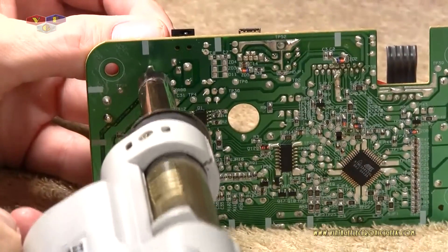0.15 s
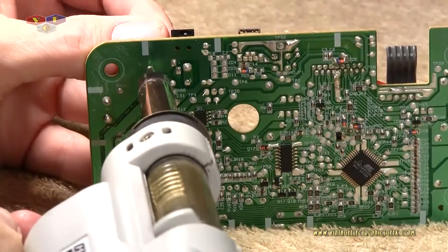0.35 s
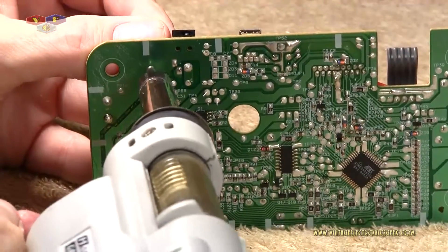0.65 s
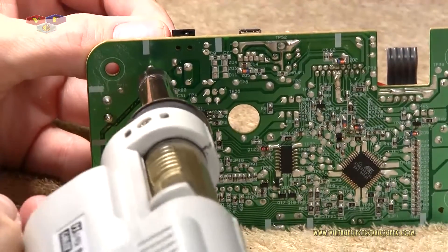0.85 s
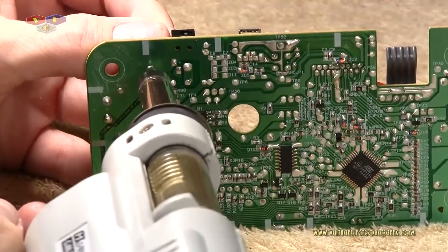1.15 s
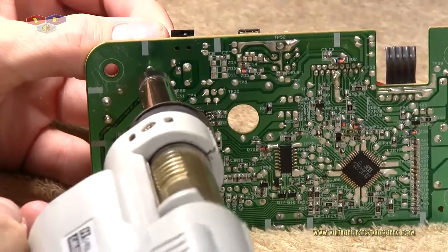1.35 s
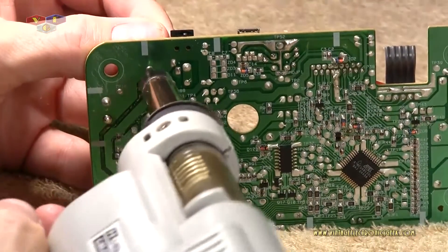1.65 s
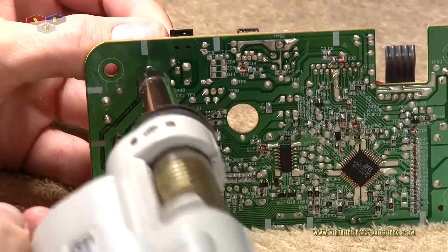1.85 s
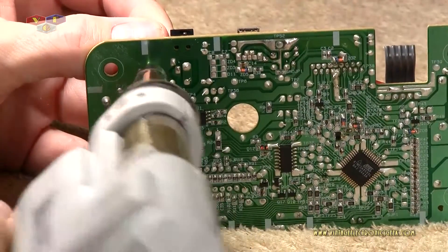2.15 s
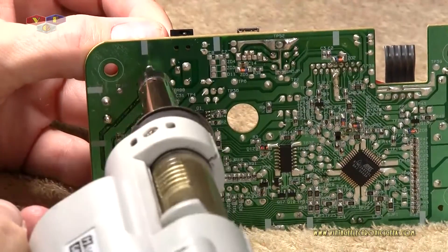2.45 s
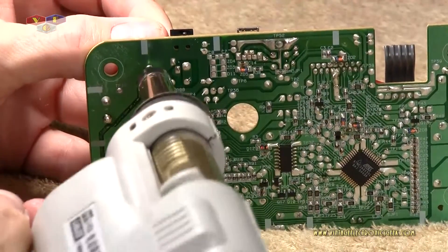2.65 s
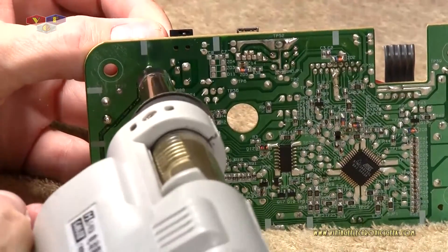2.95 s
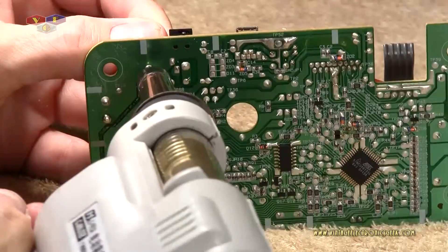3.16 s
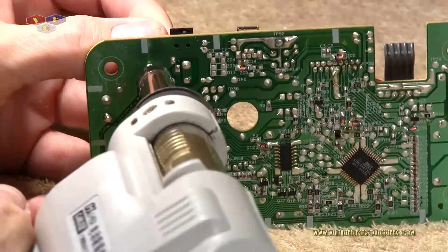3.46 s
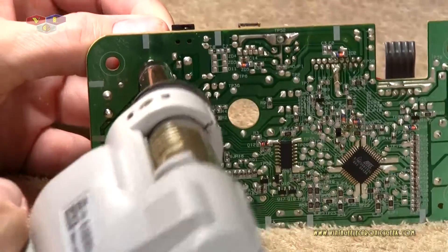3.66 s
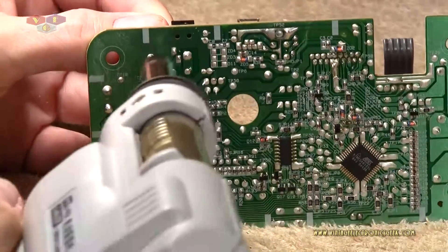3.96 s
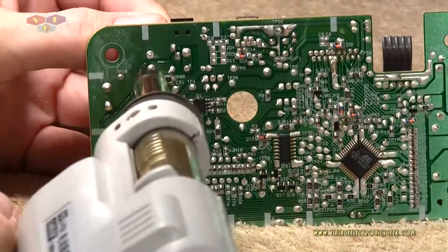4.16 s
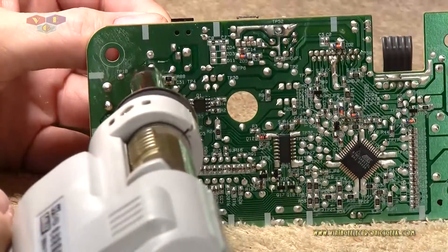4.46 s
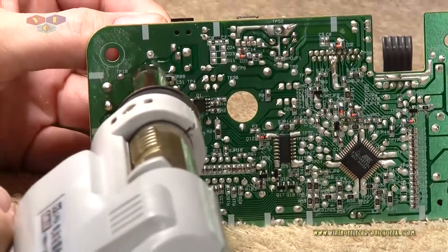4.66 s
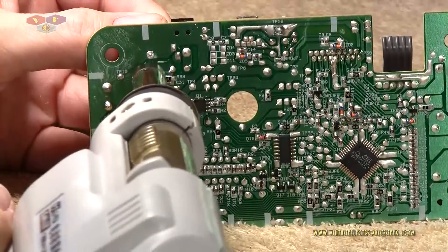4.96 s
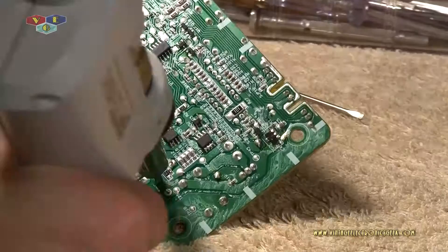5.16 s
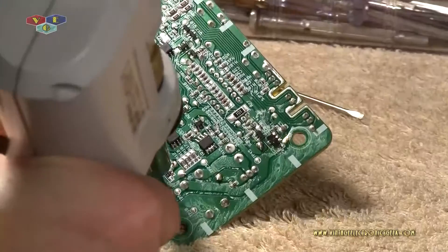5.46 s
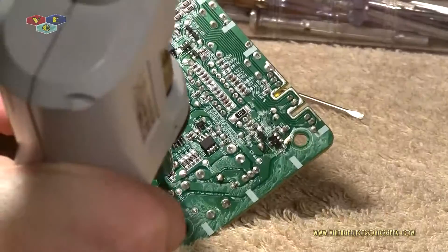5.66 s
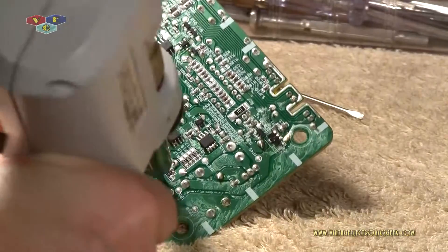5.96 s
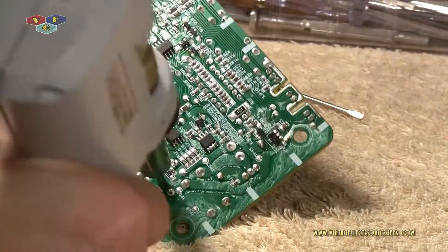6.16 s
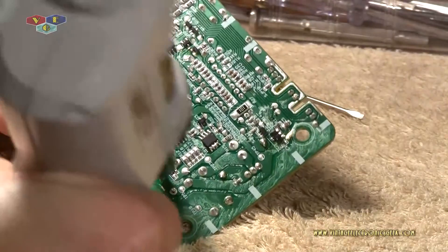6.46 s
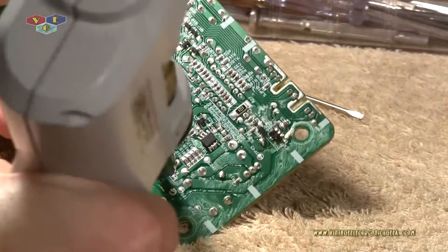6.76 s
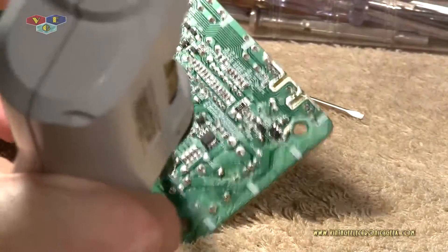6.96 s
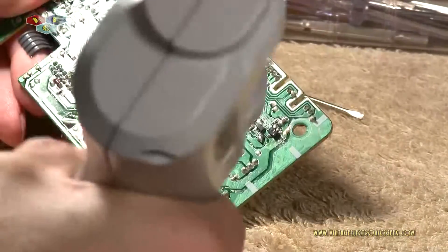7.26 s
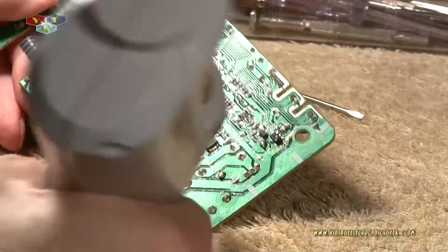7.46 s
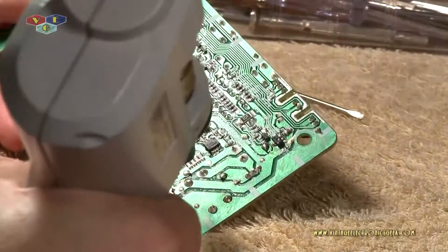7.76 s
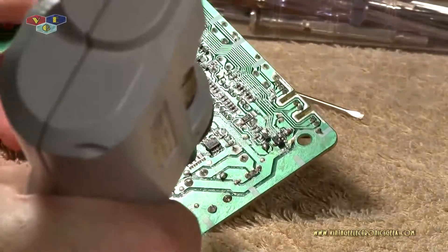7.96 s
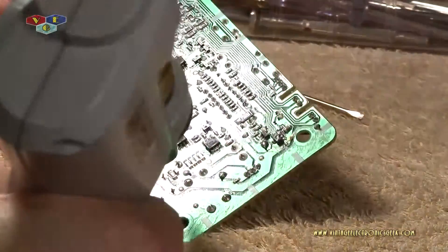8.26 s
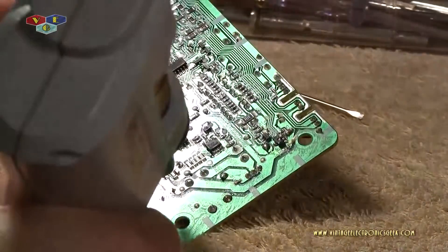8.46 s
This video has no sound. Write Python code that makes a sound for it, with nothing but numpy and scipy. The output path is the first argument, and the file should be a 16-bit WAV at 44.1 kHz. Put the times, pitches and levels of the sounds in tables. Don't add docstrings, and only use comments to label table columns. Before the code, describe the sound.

Close to the microphone, a hand-held desoldering gun clicks and its pump rattles for under half a second, then coasts out in separate knocks. After quiet fan hum and faint taps on a circuit board, a second burst lasts nearly a second, sagging in speed. The third, heard from behind the gun, is longer and steadier, stopping in a few loose knocks. Small, fairly dry room.

```python
import sys
import numpy as np
from scipy import signal
from scipy.io import wavfile
from scipy.ndimage import uniform_filter1d

SR = 44100
rng = np.random.default_rng(int(sys.argv[2]) if len(sys.argv) > 2 else 0)


def to_linear_factor(level_db):
    exponent = np.asarray(level_db, float) / 20
    return 10 ** exponent


def to_wav(sig):
    pcm = np.clip(np.atleast_2d(sig), -1, 1) * 32767
    pcm = np.round(pcm).astype(np.int16)
    wavfile.write(sys.argv[1], SR, pcm.T)


N = 379260
MOVE_S = 5.2

# angle_turns, thud_db, clack_db, tick_db, scatter_ms
STROKE = [
    [(-.40, -24, -8, 0, .1), (-.34, -11, -3, -1, .12), (-.24, -20, -5, -6, .2), (-.17, -22, -1, -4, .08),
     (-.13, 0, -3, -8, .035), (.06, -20, -7, -3, .2), (.29, -17, -8, -10, .2), (.41, -19, -12, -13, .3)],
    [(-.39, -22, -10, -7, .15), (-.33, -14, -5, -6, .2), (-.15, 0, -1, 0, .045), (-.1, -20, -2, -2, .1),
     (.02, -20, -6, -6, .2), (.09, -20, -9, -3, .2), (.27, -17, -8, -8, .25), (.44, -19, -8, -13, .25)],
]
# start_s, end_s, free_speed_turns_per_s, filter_loss_turns_per_s2
BURSTS = [
    (0.425, 0.855, 58.267, 0),
    (2.715, 3.56, 58.609, 0),
    (5.665, 7.09, 58.5645, 1.0023),
]
# slowest_s, lost_turns_per_s
STALLS = [(0.425, 26.506), (0.5763, 3.854), (0.8765, 19.976), (2.715, 23.601), (2.9346, 1.41),
          (3.1374, 21.731), (3.3585, 15.932), (3.5868, 36.079), (5.665, 29.035), (5.9111, 1.271),
          (6.8064, 2.264), (6.9666, 2.97), (7.11, 27)]
SAG_S, RECOVER_S = 0.0708, 0.0322
FULL_SPEED, LOOSE_DB = 62.5, 9
WANDER_TURNS, WANDER_HZ = 0.012, 3

# pitch_hz, density_db (per Hz)
THUD = [
    [(150, -55), (250, -22), (290, -21), (400, -13), (460, -19.5), (520, -7.5), (580, -10.5), (670, -2),
     (750, 1), (820, -9.5), (930, -15.5), (1050, -16), (1300, -29), (2200, -47.5)],
    [(150, -47), (240, -23.5), (290, -20), (400, -13.5), (480, -9), (570, -7.5), (640, -0.5), (700, -0.5),
     (760, 4), (820, -6.5), (930, -15.5), (1040, -9), (1300, -19.5), (2200, -36)],
]
# pitch_hz, density_db (per Hz)
CLACK = [
    [(710, -42), (1200, -1), (1400, -2.5), (1860, 3), (2180, -7), (2390, 3.5), (3040, -7), (4340, -3),
     (4700, -3.5), (5130, -1), (6250, -11.5), (6770, -10.5), (8000, -28), (10400, -49), (17600, -120)],
    [(800, -23), (1200, 1), (1550, 4.5), (1720, 2), (1900, 7.5), (2220, -3.5), (2430, 3), (3100, -3.5),
     (3570, -1), (4600, -7), (5270, -4), (6300, -12), (7400, -12), (10000, -38)],
]
# pitch_hz, density_db (per Hz)
TICK = [
    [(4240, -20), (7200, -14.5), (7370, -14.5), (8310, -14.5), (9530, -8), (11900, -15.5), (13000, -14.5),
     (15300, -16.5), (16000, -51)],
    [(5000, -23), (7200, -4), (8300, -3), (9100, 4), (9900, -2.5), (11600, -10.5), (12400, -10),
     (13300, -6), (14200, -10), (16000, -51)],
]
# order_multiple, level_db
SHAKE = [
    [(1, -8), (2, 0), (3, -1), (4, -8)],
    [(1, -4), (2, 0), (3, -2), (4, -3)],
]
# pitch_hz, density_db (per Hz)
HOLLOW = [(200, -46.5), (420, -18), (510, 2), (580, -4.5), (900, -42.5), (2000, -71)]
HOLLOW_DB = (10, 5)

# time_s, thud_db
BOOM = [
    [(0.44, -13), (0.52, -14), (0.68, -18), (0.76, -15.5), (0.82, -15), (0.85, -23)],
    [(2.73, -13.5), (2.8, -15), (2.95, -20.5), (3.05, -14.5), (3.12, -19), (3.22, -14), (3.36, -17),
     (3.51, -14.5), (3.55, -17.5)],
    [(5.68, -13.5), (5.76, -11.5), (5.9, -16), (6.05, -14.5), (6.25, -16), (6.6, -14.3), (6.8, -13),
     (7.045, -14), (7.08, -21)],
]
# clack_db, tick_db, shake_db
STEADY = [
    (-18.5, -33.5, -41.5),
    (-18.5, -33, -40),
    (-18.5, -31, -44),
]
# clack_db, tick_db, shake_db
PULL_DB = (0.54, 0.8, 2)
# clack_db, tick_db, shake_db
START_DB = (-3, -6, -35)
# clack_db, tick_db, shake_db
COAST_DB = (-2, 2.5, -9.)
PULL_S, START_S, COAST_S = 0.035, 0.052, 0.085
VENT_S = 0.09

# time_s, thud_peak_db, clack_db (re thud), tick_db (re thud)
SINGLES = [(0.4172, -1, -1, -15.5), (0.4275, -12, -13, -18), (0.8597, -15.5, 3.5, -9),
           (0.867, -9.5, 0.5, -12), (0.8959, -10, 0, -19), (0.917, -15, -2.5, -16),
           (0.9413, -20.5, -9, -19), (2.7004, -15, 9, -9), (2.71, -0.5, 0, -14), (3.5608, -16.5, 7, -8),
           (3.5695, -10, 0, -11), (3.5991, -11, 0.5, -15), (3.6186, -12.5, -0.5, -20),
           (3.6433, -18, -8, -20), (5.652, -11.5, 0.5, -17), (5.655, -0.5, 1.5, -15.5),
           (7.1126, -9, -6, -22), (7.1196, -18, 7.5, 0), (7.146, -17.5, -13, -23), (7.1542, -16.5, -8, -25)]
# pitch_hz, width_hz, level_db
JOLT = [(101, 87, -15), (207, 90, -13.5)]
JERK_DB = -4

# time_s, peak_db, pitch_hz, t60_s, treble_db
TAPS = [(0.4106, -20, 2760, 0.012, -18), (1.799, -38.5, 696, 0.05, -39), (2.138, -46, 1800, .03, -40),
        (2.549, -48, 3530, .04, -27), (2.692, -18, 2750, 0.019, -4), (3.754, -40.5, 3000, 0.034, -35),
        (4.045, -31, 686, 0.019, -48), (4.4868, -37.5, 1000, 0.013, -41), (4.4868, -42, 2150, .012, -30),
        (5.148, -37, 1180, 0.034, -37), (5.4475, -23.5, 2130, 0.017, -25.5), (5.494, -45, 1900, .03, -40),
        (5.6301, -22, 2200, 0.022, -20), (5.631, -33, 1100, .04, -40), (5.648, -22, 2500, .03, -7)]

# pitch_hz, density_db (per Hz)
AIR = [(15, -53), (25, -36), (97, -0.5), (145, -9), (212, -6.5), (326, -8.5), (354, -5.5), (476, -10.5),
       (575, -6), (887, -10.5), (1230, -13), (1700, -17), (7110, -26), (16000, -30.5)]
AIR_DB = -52.5
# pitch_hz, side_db (re mid)
AIR_SIDE = [(60, -21), (180, -21), (550, -20.5), (1650, -13), (4970, -5), (15000, -4.5)]
# pitch_hz, before_move_db, after_move_db, width_hz
HUM = [(56, -117.5, -70, 3.5), (185.4, -60.5, -57.5, 10.5), (215.4, -57.5, -60, 9.4),
       (366, -63.5, -65.5, 3.9), (411, -63.5, -64, 2.1), (620, -83, -96, 21), (1187, -61.5, -61, 67),
       (1444, -70.5, -63.5, 5.3)]
# pitch_hz, t60_s
ROOM = [(200, 0.073), (800, 0.22), (3000, 0.27), (12000, 0.12)]


def pump(start, end, free, fill, boom, steady):
    t = np.arange(start, end + 0.09, 1 / SR)
    view = int(start > MOVE_S)
    speed = crank(np.minimum(t, end), free - fill * (t - start))
    wander_hz = WANDER_HZ * np.array([0.4, 0.7, 1.1, 1.7])
    wander = sum(np.sin(2 * np.pi * (hz * t + rng.random())) for hz in wander_hz)
    turns = np.cumsum(speed) / SR + WANDER_TURNS * evened(wander)
    slack = np.clip(1 - speed / FULL_SPEED, 0, 1)

    count = int(np.interp(end, t, turns))
    hits = np.zeros((3, len(t)))
    for angle, *db, ms in STROKE[view]:
        luck = evened(signal.lfilter([1], [1, -0.6], rng.standard_normal((count, 4)), axis=0))
        at = np.interp(np.arange(1, count + 1) + angle, turns, np.arange(len(t)))
        at = (at + luck[:, 3] * ms * SR / 1000).astype(int)
        spread_db = luck[:, :3].T * [[0.8], [0.8], [1.1]]
        loose_db = LOOSE_DB * slack[at] * (angle < -0.3)
        hits[:, at] += to_linear_factor(np.array(db)[:, None] + spread_db + loose_db)

    vent = np.clip(1 + (end - t) / VENT_S, 0, 1) * np.clip((t - start) / 0.01, 0, 1)
    leak = vent * rng.standard_normal((3, len(t))) * to_linear_factor([[-50], [-36], [-36]])
    thud = chatter(hits[0], 0.8, 0.06)
    drive = [thud, chatter(hits[1], 0.66, 0.43), chatter(hits[2], 0.56, 0.25)] + leak
    parts = [signal.oaconvolve(d, body)[:len(t)] for d, body in zip(drive, bodies(view))]

    gathering = slack * (np.gradient(speed) > 0) * thud
    hollow = signal.oaconvolve(gathering, evened(causal(HOLLOW)))[:len(t)] / 50 / thud.std()
    parts[0] = evened(parts[0]) + to_linear_factor(HOLLOW_DB[view]) * hollow

    running = np.clip((end - t) / 0.0103, 0, 1) * np.clip((t - t[0]) / 0.012, 0, 1)
    orders = sum(to_linear_factor(db) * np.cos(2 * np.pi * k * turns + 2.78 * k) for k, db in SHAKE[view])
    parts.append(running * orders)
    level = effort(t, speed, end, boom, steady)
    on = t < end
    return t[0], sum(gain * part / part[on].std() for gain, part in zip(level, parts))


def crank(t, free):
    lost = 0
    for s, drop in STALLS:
        sag = np.clip(1 - (s - t) / SAG_S, 0, 1)
        recovery = np.exp(-abs(t - s) / RECOVER_S)
        lost = lost + drop * np.where(t < s, sag, recovery)
    return free - lost


def effort(t, speed, end, boom, steady):
    r = np.exp(-1 / (PULL_S * SR))
    pull = signal.lfilter([1 - r], [1, -r], np.gradient(speed) * SR / 100)
    start = np.clip(1 - (t - t[0]) / START_S, 0, 1)
    coast = np.clip(1 - (end - t) / COAST_S, 0, 1)
    rest_db = np.c_[steady, PULL_DB, START_DB, COAST_DB] @ [1 + 0 * t, pull, start, coast]
    thud_db = np.interp(t, *np.transpose(boom))
    return to_linear_factor(np.vstack([thud_db, rest_db]))


def chatter(hits, ms, rough):
    r = np.exp(-1000 / (ms * SR))
    trail = signal.lfilter([0, 1 - r], [1, -2 * r, r * r], hits) * 2 / np.sqrt(ms * SR / 1000)
    return np.sqrt(1 - rough) * hits + np.sqrt(rough) * trail * rng.standard_normal(len(hits))


def bodies(view):
    return causal(THUD[view]), causal(CLACK[view]), causal(TICK[view])


def singles():
    out = np.zeros(N)
    hit = np.eye(1, 1200)[0]
    for s, db, clack_db, tick_db in SINGLES:
        add(out, s, to_linear_factor(db - 25) * ring(JOLT))
        jerk = db > JERK_DB
        rattle_ms = 1.2 if jerk else 2.2
        roughness = (0.15 if jerk else 0.5, 0.88, 0.95)
        for body, rel_db, rough in zip(bodies(int(s > MOVE_S)), (0, clack_db, tick_db), roughness):
            sound = np.convolve(chatter(hit, rattle_ms, rough), body)
            add(out, s, to_linear_factor(db + rel_db) * sound / abs(sound).max())
    return out


def ring(modes):
    t = np.arange(3000) / SR
    out = np.zeros(len(t))
    for k, (hz, width, db) in enumerate(modes):
        decay = np.exp(-np.pi * width * t)
        out += to_linear_factor(db) * width * decay * np.sin(2 * np.pi * hz * t) * (-1) ** k
    return out / abs(out).max()


def taps():
    out, t = np.zeros(N), np.arange(2500) / SR
    for s, db, hz, t60, treble_db in TAPS:
        body = causal([(0.093 * hz, -40), (0.76 * hz, -6), (hz, 0), (1.2 * hz, -7), (1.63 * hz, -24),
                       (9000, treble_db), (16000, treble_db - 20)])
        rattle = rng.standard_normal(len(t)) * to_linear_factor(-60 * t / np.maximum(t60, 0.004))
        blow = 2.3 * (t == 0)
        sound = np.convolve(rattle + blow, body[:900])
        add(out, s, to_linear_factor(db) * sound / abs(sound).max())
    return out


def air():
    frames, hz = N // 512 + 6, np.fft.rfftfreq(2048, 1 / SR)
    a, b, c, d, patches = rng.standard_normal((frames, 1025, 5)).T
    patches = evened(uniform_filter1d(uniform_filter1d(patches, 14, 0), 6, 1))
    z = np.array([a + 1j * b, (c + 1j * d) * to_linear_factor(read(AIR_SIDE, hz))[:, None]])
    z = z * to_linear_factor(read(AIR, hz)[:, None] + 0.97 * patches)
    wash = signal.istft(z, nperseg=2048, noverlap=1536)[1][:, :N]
    wash = wash * to_linear_factor(AIR_DB) / wash[0].std()

    t, knots = np.arange(N) / SR, np.arange(N // 100 + 2) * 100 / SR
    for line_hz, before_db, after_db, width in HUM:
        r = np.exp(-np.pi * width * 100 / SR)
        drift = signal.lfilter([1], [1, -r], rng.standard_normal((len(knots), 2)), axis=0)
        turn = 2 * np.pi * line_hz * t
        line = np.interp(t, knots, drift[:, 0]) * np.cos(turn)
        line += np.interp(t, knots, drift[:, 1]) * np.sin(turn)
        wash[0] += evened(line) * to_linear_factor(np.where(t < MOVE_S, before_db, after_db))
    return wash


def room(x):
    echoes = np.zeros((2, SR // 2))
    at = np.arange(200, SR // 2 - 20, 20) + rng.integers(0, 20, (2, (SR // 2 - 201) // 20))
    np.put_along_axis(echoes, at, rng.choice([-1., 1.], at.shape), 1)
    hz, t, z = signal.stft(echoes, SR, nperseg=256)
    tail = signal.istft(z * to_linear_factor(-60 * t / read(ROOM, hz)[:, None]), SR, nperseg=256)[1]
    return signal.fftconvolve(x[None], tail / np.linalg.norm(tail[0]), axes=1)[:, :N]


def causal(spectrum):
    half = np.log(to_linear_factor(read(spectrum, np.fft.rfftfreq(8192, 1 / SR))))
    log_gain = np.r_[half, half[-2:0:-1]]
    return np.fft.ifft(np.exp(np.conj(signal.hilbert(log_gain)))).real[:2500]


def read(points, hz):
    f, value = np.transpose(points)
    return np.interp(np.log(hz + 1), np.log(f + 1), value)


def evened(x):
    return x / np.sqrt(np.mean(x ** 2) + 1e-20)


def add(mix, s, sound):
    part = mix[round(s * SR):][:len(sound)]
    part += sound[:len(part)]


def scene():
    gun = singles() + taps()
    for burst, boom, steady in zip(BURSTS, BOOM, STEADY):
        add(gun, *pump(*burst, boom, steady))
    wet = room(gun)
    off_centre = wet[1] - gun
    lean_band = signal.butter(3, (580, 850), "band", fs=SR, output="sos")
    lean = signal.sosfilt(lean_band, off_centre)
    low = signal.sosfilt(signal.butter(2, 200, "low", fs=SR, output="sos"), off_centre)
    mid, side = air()
    side = side - to_linear_factor(-33) * mid + to_linear_factor(-35) * lean + to_linear_factor(-27.5) * low
    mid = mid + to_linear_factor(-0.3) * gun + to_linear_factor(-13) * wet[0]
    return np.array([mid + side, mid - side])


def low_pass(x):
    return signal.sosfilt(signal.butter(12, 16260, fs=SR, output="sos"), x)


def record(dry):
    rounded = np.clip(dry / (1 + abs(dry / 1.25) ** 3) ** (1 / 3), -1, 1)
    edge = signal.firwin(255, 16150, window=("kaiser", 7), fs=SR)
    limited = signal.oaconvolve(rounded, edge[None], "same")
    return low_pass(limited)


dry = scene()
out = record(dry)
to_wav(out)
```